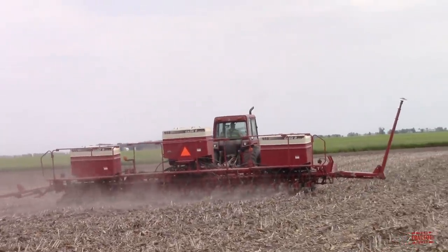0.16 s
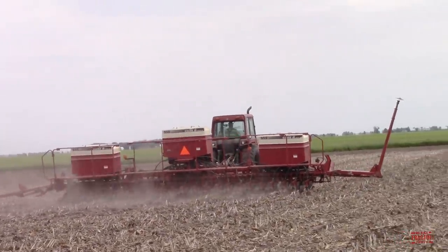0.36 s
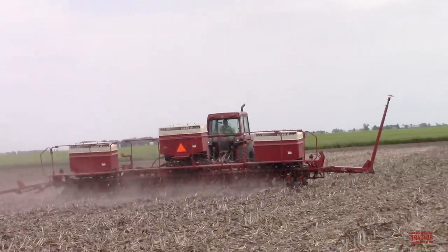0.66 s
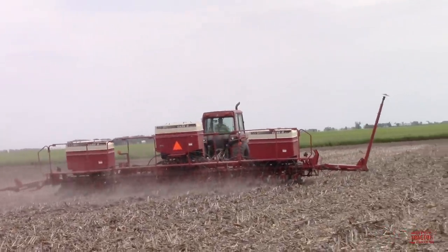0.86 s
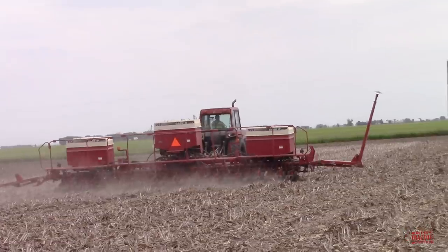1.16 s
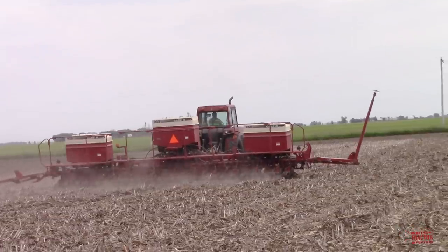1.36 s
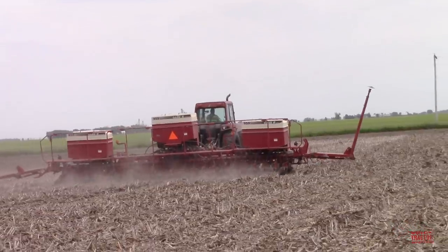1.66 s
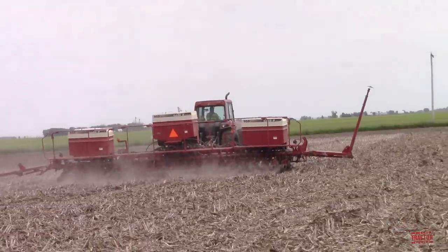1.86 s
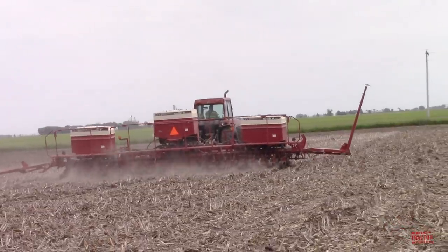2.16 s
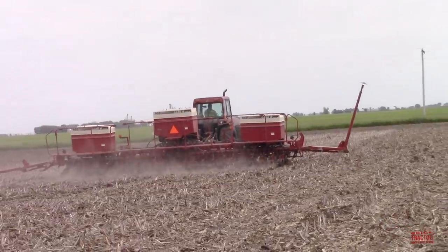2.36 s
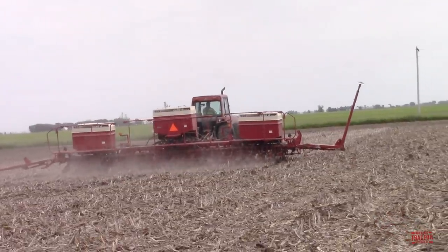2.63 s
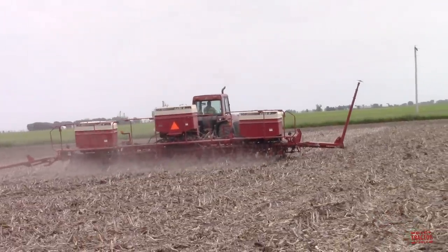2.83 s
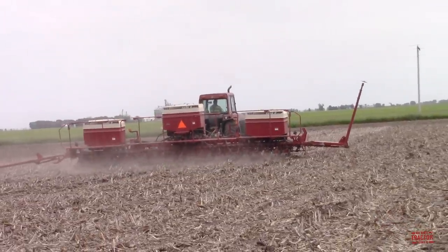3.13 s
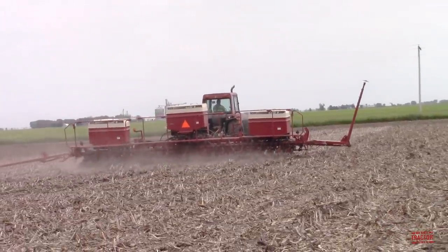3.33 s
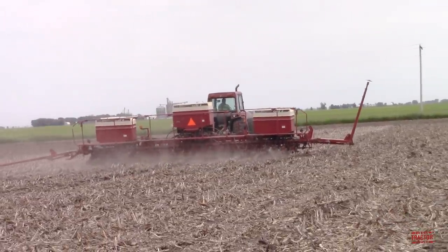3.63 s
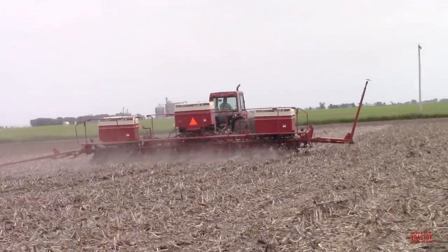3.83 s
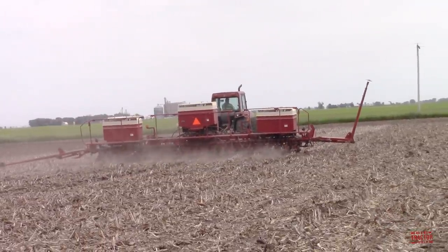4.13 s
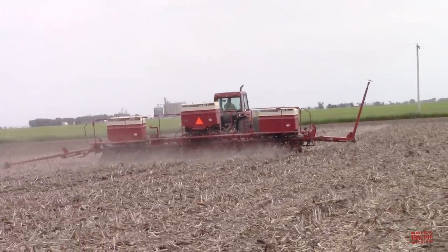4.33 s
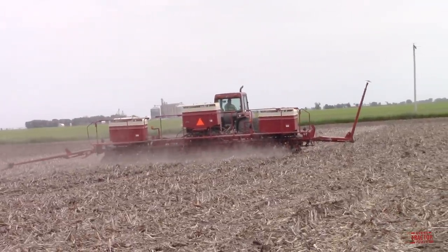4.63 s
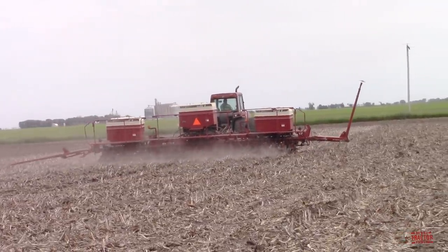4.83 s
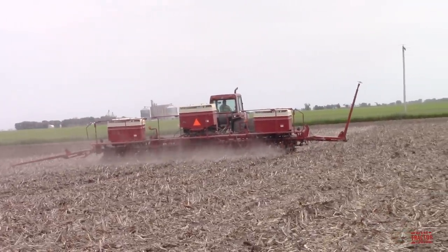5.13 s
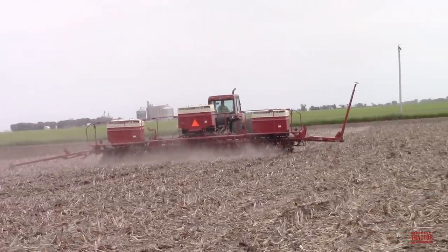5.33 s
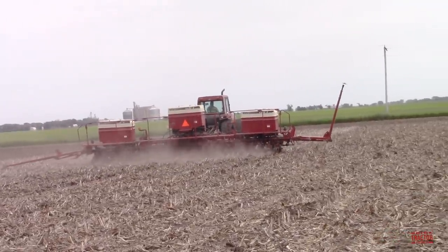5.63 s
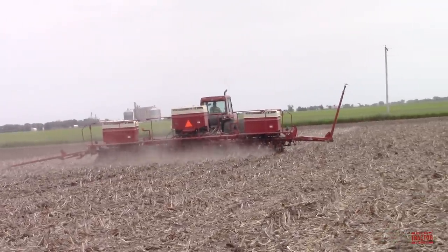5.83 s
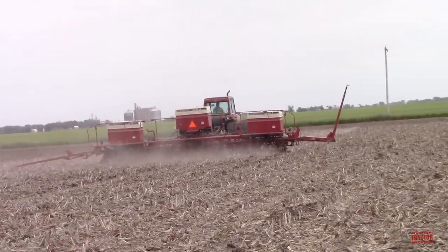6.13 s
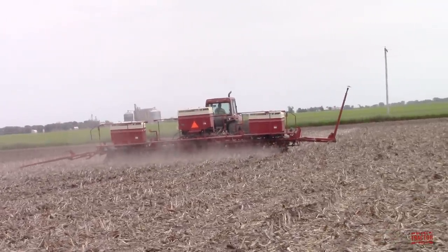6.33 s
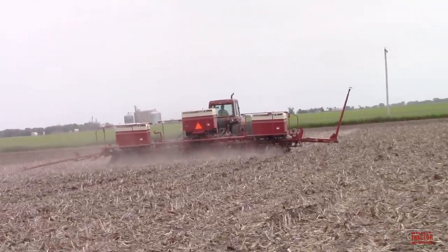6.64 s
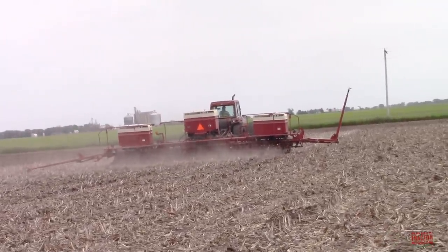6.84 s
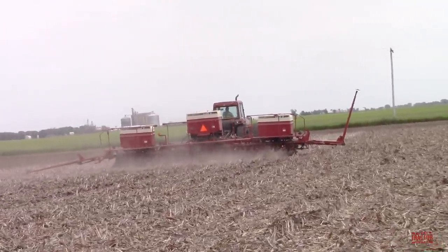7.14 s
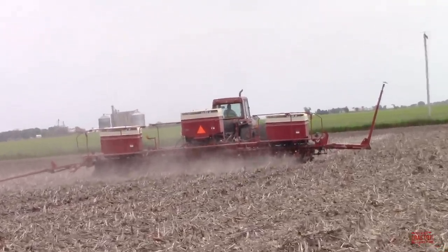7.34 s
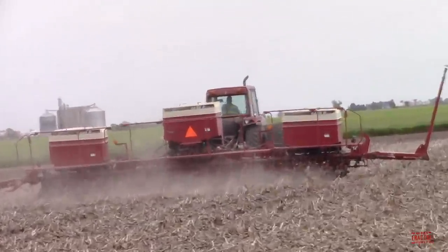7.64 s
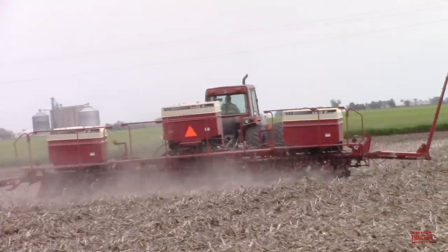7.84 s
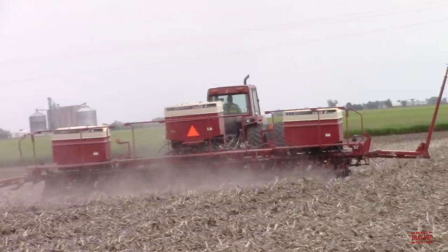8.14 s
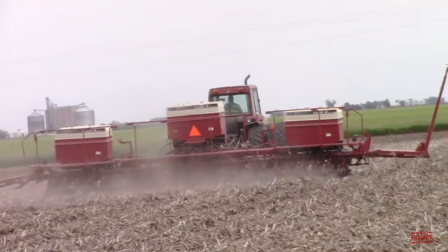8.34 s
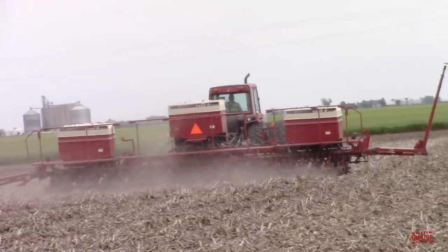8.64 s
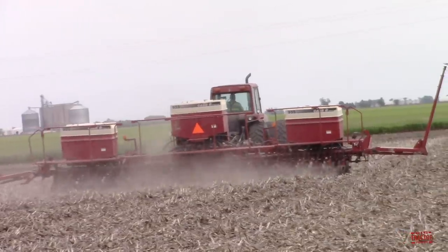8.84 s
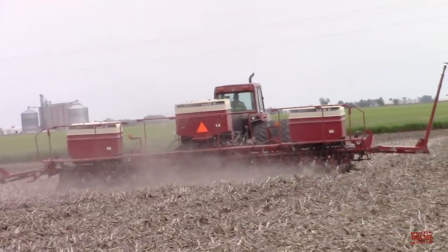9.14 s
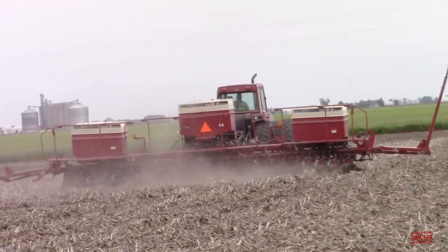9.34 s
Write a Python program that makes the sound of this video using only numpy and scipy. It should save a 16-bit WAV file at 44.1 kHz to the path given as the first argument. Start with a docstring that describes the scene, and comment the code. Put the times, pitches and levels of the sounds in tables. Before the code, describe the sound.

Steady throbbing diesel roar with rustling stalks, whining machinery and wind buffeting, losing level and bass past the middle while continuing to the end.

```python
"""Dry stubble in gusty air: a six-cylinder diesel tractor drags a seed planter, heard from behind.
Exhaust is cycle harmonics over pulsing roar; clatter, stalks and fan hiss are noise throbbing at the firings.
Pump and fan whine as sines, knocks are damped rings, ticks noise specks, and disc bearings squeak as rough tones.
Low noise gives the wind that buffets the microphone. Past the middle the level drops, the bass most;
the sound widens and its treble leans a little to the left."""
import sys
import numpy as np
from scipy import signal
from scipy.io import wavfile
from scipy.ndimage import uniform_filter1d, map_coordinates

SR = 44100
rng = np.random.default_rng(int(sys.argv[2]) if len(sys.argv) > 2 else 0)


def generate_wav(sig):
    """Save sig (samples, or channels by samples) to the path in sys.argv[1] as 16-bit PCM at SR."""
    pcm = np.round(np.clip(np.atleast_2d(sig).T, -1, 1) * 32767).astype(np.int16)
    wavfile.write(sys.argv[1], SR, pcm)


N = 418494

# Engine firing rate: start_s, rate_firings_per_s
FIRING_RATE = [(0.0, 123.25), (0.4, 123.1), (0.8, 123.55), (1.4, 123.5), (1.8, 123.1), (2.2, 123.45),
               (2.6, 123.3), (2.9, 123.7), (3.5, 123.9), (4.0, 123.6), (4.9, 123.78), (5.4, 123.4),
               (5.7, 123.68), (6.7, 123.5), (7.3, 123.87), (7.8, 123.52), (8.2, 123.66), (8.6, 124.3),
               (9.49, 123.9)]
# Relative strength of the successive firings in a cycle: level_db
CYLINDER_DB = [-10, -10, -18, -6.5, -11, -11]
# Harmonics of the six-firing cycle: multiple_of_cycle_rate, relative_level_db
EXHAUST_HARMONICS = [(6, -52), (12, -48.3), (14, -48.4), (15, -50.6), (17, -48.6), (18, -47.9), (21, -51.1),
                     (22, -47.6), (23, -48.2), (24, -44.4), (25, -42.4), (26, -41.9), (28, -35.4),
                     (29, -39.3), (30, -29.6), (31, -37.4), (34, -37.2), (35, -32.0), (36, -35.6),
                     (39, -42.2), (40, -44.9), (41, -42.0), (45, -49.1), (47, -49.2), (48, -47.3),
                     (49, -47.4), (56, -43.2), (57, -44.8), (62, -41.2), (79, -47.8)]
# Harmonics given their own slow drift: multiple_of_cycle_rate
LEADING_HARMONICS = (6, 30, 35)
# Their coming and going: time_s, then for each leading harmonic change_db
HARMONIC_DRIFT = [(0, -2, 0, 3), (.4, 1, 1.5, 0.5), (.85, -0.5, 1, -4), (1.25, -0.5, -1, -4),
                  (1.5, -2, -1, 0), (1.7, -2, 2, -10), (2.0, -1, -1, 4), (2.35, -9, -1.5, -1),
                  (2.6, -6, -1.5, -1.5), (3.0, -5, 2.5, 2), (3.25, -2, -3.5, -6), (3.5, -5, 0.5, 3),
                  (4.0, -11, -2, -2), (4.7, -4, 2.5, 0), (4.87, -4, -9.5, -3), (5.2, 2, 0.5, 3),
                  (5.7, 2, -1.5, -4), (6.6, 0, 3, 2), (8.4, 0, -5, -5), (8.9, 0, 1, -8), (9.49, 0, 1, -2)]
FIRST_BLOW, LOUDEST_PUFF = .2, 4.25  # places in the cycle (firings)

# Noise spectra, shape only: freq_hz, relative_density_db (per Hz)
EXHAUST_SPECTRUM = [(250, -38), (420, -8.5), (440, -18), (533, -9.5), (612, 0), (728, -2), (899, -4.5),
                    (960, -10.5), (1250, -16), (2110, -120)]
CLATTER_SPECTRUM = [(520, -51), (900, -10), (1000, -3.5), (1170, -0.5), (1310, -1), (1470, -6), (1630, -3),
                    (2000, -6.5), (2600, -21), (4400, -120)]
RUSTLE_SPECTRUM = [(1090, -55), (1850, -9.5), (2500, -2.5), (3450, -9.5), (4480, -17.5), (7590, -120)]
CRACKLE_SPECTRUM = [(1940, -24), (3300, -3), (4610, -0.5), (5250, -5), (5600, -15.5), (7280, -21),
                    (12300, -120)]
HISS_SPECTRUM = [(3240, -51), (5500, -39), (5650, -10.5), (6240, -2), (7050, -1), (9050, -5.5),
                 (10400, -11.5), (13100, -32), (14400, -32), (15600, -38)]
THUD_SPECTRUM = [(24, -72), (40, -63), (113, -6.5), (180, 0.5), (230, -6), (400, -120)]
WIND_SPECTRUM = [(97, -65), (165, -9.5), (237, 1.5), (470, 0.5), (610, -3), (1030, -120)]
RUMBLE_SPECTRUM = [(20, -4), (40, -3), (90, 2), (160, 0), (300, -20), (500, -80)]

# Crackle against the rustle: time_s, level_db
CRACKLE_LEVEL = [(0, 3), (.4, -9), (1.2, -8.5), (2.0, -5.5), (2.9, -5.5), (3.5, -7), (3.85, -10.5),
                 (4.2, -0.5), (5.0, -3.5), (5.5, -7), (6.2, -5), (6.7, -3), (7.3, -6), (8.0, -3.5),
                 (8.9, -5), (9.49, -3)]
# Slow level as the air carries the sound: time_s, exhaust_db, clatter_db, planter_db, fan_db
CARRYING = [(0.0, -24.5, -23.5, -33, -30.5), (0.4, -22, -24, -26.5, -29.5), (0.85, -24, -23, -26, -32),
            (1.25, -26, -26, -29, -33.5), (1.5, -20.5, -23.5, -29, -34), (1.85, -22.5, -28.5, -29, -35),
            (2.15, -22, -22.5, -30.5, -35.5), (2.6, -24, -27.5, -28.5, -35.5), (3.0, -22, -26, -29, -33),
            (3.65, -20, -21.5, -23.5, -36), (4.0, -22, -22, -31.5, -36), (4.75, -23, -24, -31.5, -33),
            (5.05, -22.5, -24.5, -30.5, -33), (5.33, -28, -23, -26.5, -33), (5.6, -24, -25, -31.5, -36),
            (5.8, -25.5, -30, -33.5, -39.5), (6.1, -33.5, -32.5, -34.5, -41), (6.6, -30.5, -34.5, -37, -40),
            (7.2, -32.5, -34.5, -35.5, -43), (7.6, -30.5, -33, -35.5, -43.5), (8.0, -33, -35, -35.5, -39),
            (8.2, -32.5, -31.5, -36.5, -42), (8.55, -27.5, -36, -37.5, -40),
            (8.85, -34.5, -33.5, -38, -44.5), (9.2, -32.5, -34.5, -36.5, -42.5),
            (9.49, -31, -35.5, -40, -43)]
# Brief swells (or lulls) of the din: centre_s, height_db, length_s (at the centre pitch),
# centre_octaves (above 1 kHz)
DIN_SWELLS = [(0.084, 0, .12, 3), (0.293, 6, 0.12, 1.4), (0.52, 3, 0.15, 0.5), (0.665, 6, 0.07, 1.9),
              (0.794, -2, 0.16, 3), (1.183, 4.5, 0.14, 0.2), (1.187, 3, 0.086, 3.5),
              (1.32, -2.5, 0.082, 3.5), (1.545, 3.5, 0.067, 1), (1.55, 1.5, .06, 1.9),
              (1.614, 7, 0.12, 2.1), (1.75, -6.5, 0.13, 2.5), (1.8, -2, 0.18, 0), (1.93, 5.5, 0.24, 1.2),
              (2.076, -0.5, 0.14, 2), (2.244, 6.5, 0.12, 2.1), (2.584, 3.5, 0.24, 0.8),
              (2.804, -3.5, 0.11, 1), (2.974, 4.5, 0.29, 1.1), (3.19, 5, 0.21, 1.5), (3.2, 2, 0.066, 2.5),
              (3.36, -2.5, 0.081, 1.5), (3.454, -2.5, 0.081, 3.5), (3.493, -2, .05, 2),
              (3.535, 1.5, .04, 3), (3.59, 7, 0.12, 2.5), (3.717, 1, .08, 2), (3.797, 1, 0.11, 1.3),
              (3.83, 1.5, .2, 3), (4.065, 4, 0.1, 3), (4.35, 2, 0.2, 3), (4.62, 4, 0.078, 2.5),
              (4.763, 9, 0.047, -1.6), (4.896, 2.5, .08, 3.5), (5.323, 1.5, 0.077, 2.2),
              (5.782, 0.5, 0.17, 2), (6.24, 4, 0.083, 2), (6.54, -7, .08, 0), (6.404, -5, 0.1, 2.5),
              (6.52, 3, 0.078, 1.3), (6.68, -3.5, 0.22, 0.2), (6.9, 7, 0.089, 2), (6.915, 3.5, 0.057, 2.8),
              (7.032, -2.5, .1, 3), (7.07, 1.5, 0.073, 1.5), (7.2, 1.5, 0.085, 2), (7.436, 5.5, 0.18, 2.5),
              (7.632, 4.5, 0.081, 2.6), (7.768, -4, 0.18, 1.8), (7.95, -0.5, .14, 3), (8.13, 4, .15, -0.5),
              (8.15, 1, 0.053, 2.2), (8.32, 2, 0.11, 1), (8.695, -4.5, 0.26, 1), (8.55, 2, .06, -0.5),
              (8.81, 1.5, .06, 0.5), (8.932, 4, 0.12, 1.7), (9.19, 5, 0.16, 2)]
SWELL_OCTAVES = 0.71  # standard deviation in pitch, to either side
SWELL_SHORTENING = 0.12  # octaves of length that a swell loses per octave of pitch

# Pump tones, geared to the crank: multiple_of_firing_rate, relative_level_db
PUMP_TONES = [(32.62, 0), (38.04, -2)]
# Fan blade tones: mean_pitch_hz, relative_level_db
FAN_TONES = [(3811, 1), (4445, -1.5), (5078, -5)]
# Whine levels: time_s, pump_db, fan_db
WHINE_LEVELS = [(0.0, -45, -46), (0.5, -45, -41), (1.05, -43, -43), (1.5, -46, -45), (2.1, -45, -53),
                (3.4, -48, -49), (4.3, -40, -49), (5.3, -45, -48), (6.1, -53, -58), (7.4, -56, -64),
                (7.95, -52, -62), (8.1, -55, -62), (8.3, -50, -61), (8.55, -51, -60), (8.8, -56, -59),
                (9.13, -48, -59), (9.3, -54, -60), (9.49, -54, -60)]

# Depth of the dip where the ground echo cancels one band: time_s, depth_db (values above 0 give no dip)
HOLLOW_DEPTH = [(0, -2), (1.1, -7), (1.7, -1), (2.6, -2.5), (3.0, -5), (4.0, -1), (9.49, 1)]
HOLLOW_HZ, HOLLOW_WIDTH_HZ = 900, 54  # centre and standard deviation

# Gusts (and lulls) on the microphone: centre_s, length_s, thud_change_db, roar_change_db
WIND_GUSTS = [(.4, 0.1, 6, 2), (0.198, 0.082, 5, 2.5), (1, 0.11, 8, -2), (1.657, 0.25, 10, 3.5),
              (1.942, 0.22, 10, 7), (2.602, 0.11, 5, 1), (2.17, 0.096, -1, -6), (2.847, 0.05, 6, 6),
              (2.977, 0.076, -5, -4), (3.623, 0.05, -2, 5.5), (3.9, 0.43, 3, 3), (4.15, 0.1, -6, 0.5),
              (4.755, 0.21, -2, 3), (5.093, 0.12, -3, 6.5), (5.203, 0.11, 15, 3), (5.293, 0.076, 9.5, 2),
              (5.38, 0.091, 3, -2), (5.47, .1, 6, 2), (5.552, 0.047, 5, 1), (5.602, 0.082, 12, 13),
              (5.702, 0.077, 6, 10), (5.96, .08, 0, -3), (6.02, 0.037, 2, 6), (7.11, .1, 0, 4),
              (7.72, 0.32, 11, 5.5), (7.97, 0.09, -4, -4), (8.332, 0.43, 15, 7.5), (8.5, 0.074, 4, 0),
              (9.122, 0.069, 5, 7), (9.257, 0.076, 5, 5.5)]
THUD_DB, ROAR_DB = -51, -33.5  # steady wind before the slow changes and gusts
# Slow changes of the wind: time_s, thud_change_db, roar_change_db
WIND_EASING = [(0, 1, -1), (5.72, 6, 0.5), (5.86, -5, 3.5), (6.2, -4, -3), (9.49, 2.5, 1)]

# Disc-bearing squeaks: start_s, length_s, peak_level_db, mean_pitch_hz
BEARING_SQUEAKS = [(0.42, .07, -30, 7310), (0.51, .03, -32, 7550), (0.545, .035, -31, 7100),
                   (0.95, .06, -33, 7430), (1.04, .06, -30.5, 7290), (1.1, .09, -32.5, 7230),
                   (1.32, .1, -37, 7360), (2.098, .035, -31, 7430), (2.26, .05, -35, 7430),
                   (3.99, .08, -34, 7280), (4.08, .04, -36, 7330), (4.815, .05, -33, 7370),
                   (4.88, .03, -32, 7150), (5.05, .06, -30.5, 7190), (5.14, .04, -36, 6800),
                   (7.195, .04, -39, 7180), (8.033, .03, -39, 7310), (8.134, .035, -39, 7300)]
# Loose metal knocks on the planter: start_s, strength_db (relative), pitch_hz
METAL_KNOCKS = [(1.0989, -8, 1600), (1.5339, 2, 1300), (2.5087, -2, 1580), (2.9642, 1, 1206),
                (2.9938, -1.5, 1290), (3.5264, -12, 1150), (3.63, -1, 1105), (3.68, -8, 1210),
                (6.764, -15, 3220), (7.5794, -27, 2470), (7.5984, -17, 2310), (7.605, -10, 1670),
                (7.6193, -15, 1970), (8.0396, -15, 1310), (8.044, -15, 3620), (8.1454, -18, 1490),
                (8.16, -18, 2950), (8.331, -19, 2370)]
# Bright ticks: start_s, strength_db (before filtering and decay), lowest_hz, highest_hz
BRIGHT_TICKS = [(3.9144, -33, 11000, 15500), (3.9274, -33, 11000, 15500), (4.0682, -30, 12000, 15500),
                (4.0685, -8, 5000, 7000), (4.1909, -36, 11000, 15500), (4.8853, -13, 6500, 8500),
                (5.3794, -36, 9000, 15500), (5.657, -39, 10000, 15500), (8.0401, -22, 6500, 9000),
                (8.1504, -21, 6500, 9000), (8.295, -38, 8500, 14000)]

# Share of the thinner spectrum: time_s, share (0-1)
THIN_SHARE = [(0, 0), (5.7, 0), (6.15, 1), (9.49, 1)]
# Full thinning: freq_hz, change_db
THIN_SPECTRUM = [(60, -26), (125, -31), (250, -22.5), (600, -16), (1000, -9.5), (1600, -1.5), (2500, 0.5),
                 (9000, -2), (14000, -9.5)]
# The lows thin out first: freq_hz, power (on the share)
THIN_POWER = [(100, .35), (300, 0.86), (800, 1.2), (3000, 1.9)]
# Bass jumps to a new offset: start_s, offset_db
BASS_OFFSETS = [(6.085, -12.5), (6.578, -5.5), (7.08, -0.5), (7.6, 1.5), (8.07, 2.5), (8.63, -4.5),
                (9.09, -2)]
# How much of each offset a pitch takes: freq_hz, share
BASS_OFFSET_SHARE = [(100, 0.64), (300, 0.62), (440, 0.75), (480, 1.2), (530, 1.1), (580, 1.4), (620, 1),
                     (680, 0.86), (800, 0.32), (1000, 0.24), (1400, .01)]
# Share of the sideways sound: time_s, share (0-1)
SIDE_SHARE = [(0, 0), (5.77, 0), (5.8, .5), (6.05, 1), (9.49, 1)]
# Level tilt at full share, before the unrelated side: freq_hz, left_minus_right_db
LEFT_TILT = [(300, 0), (800, 1), (1050, 0), (2600, 0), (3500, 2.5), (4500, 3.7), (5400, 3), (8000, 2),
             (10000, 2), (12000, 0)]
# Lag of the left behind the right at full share: freq_hz, phase_rad
LEFT_PHASE_LAG = [(5000, 0), (6800, .1), (9500, .5), (15000, .5)]
# Unrelated side sound against the middle, at full share: freq_hz, level_db
UNRELATED_SIDE = [(60, -2.), (110, -7.), (200, -29), (400, -36), (750, -14.5), (1050, -19), (1300, -38),
                  (1900, -47), (2600, -25), (4000, -16), (8000, -7.5), (15000, 11)]
RUMBLE_DB, EDGE_HZ = -81.5, 15720  # faint late floor; upper band limit


def gain_of(db):
    """Logarithmic level: decibels become an amplitude factor."""
    return 10 ** (np.asarray(db) / 20)


def evened(x):
    """Power normalisation: the root mean square becomes one."""
    return x / np.sqrt(np.mean(x ** 2) + 1e-20)


def read(points, hz):
    """Spectral interpolation along a logarithmic frequency axis."""
    f, value = np.transpose(points)
    return np.interp(np.log(hz + 1), np.log(f + 1), value)


def curve(table, axis=1):
    """Linear interpolation in time: one column of a table at every sample."""
    rows = np.asarray(table)
    return np.interp(np.arange(N) / SR, rows[:, 0], rows[:, axis])


def wander(top_hz):
    """Slow fluctuation: superposed sines of random phase, up to top_hz, of rms one."""
    t = np.arange(0, N + 256, 256) / SR
    slow = 0
    for f in np.geomspace(top_hz / 8, top_hz, 16):
        slow = slow + np.sin(2 * np.pi * (f * t + rng.random())) / np.sqrt(f)
    return np.interp(np.arange(N) / SR, t, evened(slow))


def noise(spectrum, patchy_db, drive=1):
    """Modulated, filtered noise: drifting spectral patches arise as moving air bends the path."""
    hz, _, z = signal.stft(drive * rng.standard_normal(N), SR, nperseg=1024, noverlap=768)
    patches = rng.standard_normal(z.shape[::-1]).T
    patches = uniform_filter1d(patches, size=10, axis=0)
    patches = evened(uniform_filter1d(patches, size=10, axis=1))
    z = z * gain_of(read(spectrum, hz)[:, None] + patchy_db * patches)
    return evened(signal.istft(z, nperseg=1024, noverlap=768)[1][:N])


def throb(firings, depth, decay, uneven_db):
    """Amplitude modulation: loudness jumps at each firing and decays (time constant in firings)."""
    which = firings.astype(int)
    size_db = np.asarray(CYLINDER_DB)[which % len(CYLINDER_DB)]
    size_db = size_db + uneven_db * rng.standard_normal(2000)[which]
    puff = gain_of(size_db) * np.exp(-(firings % 1) / decay)
    return evened(1 + depth * uniform_filter1d(puff, size=50))


def snaps(per_s, spread_db, decay_s):
    """Random impulse process: stalks break at chance moments and each burst decays exponentially."""
    struck = rng.random(N) < per_s / SR
    size = gain_of(spread_db * np.minimum(rng.exponential(1, N), 4)) * struck
    return evened(1 + signal.lfilter([1], [1, -np.exp(-1 / (decay_s * SR))], size))


def bump(s, length, square=2):
    """Bell envelope about s, length wide at half height; a higher square flattens the top."""
    t = np.arange(0, N + 64, 64) / SR
    return np.exp(-np.log(2) * abs(2 * (t - s) / max(length, .03)) ** square)


def stretch(coarse):
    """Upsampling by interpolation: values at every 64th sample reach all samples."""
    return np.interp(np.arange(N), np.arange(len(coarse)) * 64, coarse)


def exhaust(firings):
    """Periodic pulsation: cycle harmonics, loosely in phase at the loudest puff, join throbbing roar."""
    cycle = 2 * np.pi * (firings - LOUDEST_PUFF) / len(CYLINDER_DB)
    drift_db = {k: curve(HARMONIC_DRIFT, axis=column)
                for column, k in enumerate(LEADING_HARMONICS, start=1)}
    tones = 0
    for k, db in EXHAUST_HARMONICS:
        level_db = db + drift_db.get(k, 0) + 0.8 * wander(3.5)
        phase = k * cycle + .8 * wander(1.2) + .2 * wander(9.)
        tones = tones + gain_of(level_db) * np.cos(phase)
    # The strongest firing falls just before the loudest puff
    puffs = firings + len(CYLINDER_DB) + np.argmax(CYLINDER_DB) - LOUDEST_PUFF + .15
    roar = noise(EXHAUST_SPECTRUM, 0.79, throb(puffs, depth=0.9, decay=0.58, uneven_db=5.5))
    tone_share = gain_of(-1.9)
    roar_share = np.sqrt(np.maximum(1 - tone_share ** 2, .05))  # keeps the total power
    return tone_share * evened(tones) + roar_share * roar


def clatter(blows):
    """Impact noise: band-limited noise is strongly modulated by the firings."""
    return noise(CLATTER_SPECTRUM, 1.0, throb(blows, depth=3.4, decay=.5, uneven_db=1.8))


def planter(blows):
    """Fracture noise: dense rustle and sparser crackle of stalks share the engine's modulation."""
    rustle_drive = throb(blows, depth=2., decay=.45, uneven_db=1.5) * snaps(120., .5, .001)
    crackle_drive = throb(blows, depth=1.8, decay=0.4, uneven_db=3.0) * snaps(32.0, 0.7, 0.001)
    rustle = noise(RUSTLE_SPECTRUM, .9, rustle_drive)
    crackle = noise(CRACKLE_SPECTRUM, 2.2, crackle_drive)
    return rustle + gain_of(curve(CRACKLE_LEVEL)) * crackle


def fan_hiss(blows):
    """Broadband flow noise: high hiss is lightly modulated, its firing pattern two firings late."""
    return noise(HISS_SPECTRUM, 1.8, throb(blows - 2, depth=.6, decay=0.4, uneven_db=3.5))


def swollen(x):
    """Time-varying filtering: each swell lifts the pitches around its centre, higher ones more briefly."""
    hz, t, z = signal.stft(x, SR, nperseg=512)
    octaves = np.linspace(-2, 4, 19)  # above 1 kHz
    rows = []
    for octave in octaves:
        row = 0
        for s, db, length, centre in DIN_SWELLS:
            reach = np.exp(-.5 * ((octave - centre) / SWELL_OCTAVES) ** 2)
            length_here = length * 2 ** (SWELL_SHORTENING * (centre - octave))
            row = row + db * reach * bump(s, length_here)[::4]  # one value per spectral frame
        rows.append(row)
    place = np.interp(np.log2((hz + 1) / 1000), octaves, np.arange(len(octaves)))
    grid = np.meshgrid(place, np.arange(len(t)), indexing="ij")
    lift_db = map_coordinates(np.array(rows), grid, order=1, mode="nearest")
    return signal.istft(z * gain_of(lift_db), nperseg=512)[1][:N]


def whines(firings):
    """Rotational tones: hydraulic pump and seed fan sound as sines, flickering and slightly unsteady."""
    drift_s = np.cumsum(.0012 * wander(14.)) / SR  # shared slip of phase, as time
    pump_phase = 2 * np.pi * (firings + FIRING_RATE[0][1] * drift_s)
    fan_phase = 2 * np.pi * (np.arange(N) / SR + drift_s)
    pump = sum(gain_of(db + 2 * wander(6.)) * np.sin(k * pump_phase) for k, db in PUMP_TONES)
    fan = sum(gain_of(db + 2 * wander(6.)) * np.sin(hz * fan_phase) for hz, db in FAN_TONES)
    return gain_of(curve(WHINE_LEVELS, axis=1)) * pump + gain_of(curve(WHINE_LEVELS, axis=2)) * fan


def machine():
    """Superposition: engine and planter, locked to one firing count, add with the whines."""
    firings = np.cumsum(curve(FIRING_RATE)) / SR
    blows = firings + len(CYLINDER_DB) - FIRST_BLOW
    parts = exhaust(firings), clatter(blows), planter(blows), fan_hiss(blows)
    din = sum(gain_of(curve(CARRYING, axis=k)) * part for k, part in enumerate(parts, start=1))
    return swollen(din) + whines(firings)


def hollowed(x):
    """Destructive interference: a narrow band dips by a depth that varies in time."""
    hz, t, z = signal.stft(x, SR, nperseg=2048)
    dip = np.exp(-.5 * ((hz - HOLLOW_HZ) / HOLLOW_WIDTH_HZ) ** 2)
    depth_db = np.minimum(np.interp(t, *np.transpose(HOLLOW_DEPTH)), 0)
    return signal.istft(z * gain_of(np.outer(dip, depth_db)), nperseg=2048)[1][:N]


def wind():
    """Turbulent pressure: lumpy low noise buffets the microphone and rises in gusts."""
    lumps_db = 1.0 * wander(24.)
    thud_gusts = sum(db * bump(s, length, square=1.8) for s, length, db, _ in WIND_GUSTS)
    roar_gusts = sum(db * bump(s, length, square=2.2) for s, length, _, db in WIND_GUSTS)
    thud_db = THUD_DB + curve(WIND_EASING, axis=1) + stretch(thud_gusts) + lumps_db
    roar_db = ROAR_DB + curve(WIND_EASING, axis=2) + stretch(roar_gusts) + lumps_db
    return gain_of(thud_db) * noise(THUD_SPECTRUM, 1.) + gain_of(roar_db) * noise(WIND_SPECTRUM, 1.1)


def squeaks():
    """Frequency modulation: brief whistles, roughened by random pitch, swell and fade."""
    out = np.zeros(N + SR)
    shake = rng.standard_normal((len(BEARING_SQUEAKS), 5000))
    for (s, length, db, hz), chance in zip(BEARING_SQUEAKS, shake):
        count = int(length * SR)
        shaky_hz = hz * (1 + 0.09 * uniform_filter1d(chance, size=80)[:count])
        whistle = np.sin(2 * np.pi * np.cumsum(shaky_hz) / SR)
        out[round(s * SR):][:count] += gain_of(db) * np.hanning(count) ** .5 * whistle
    return out[:N]


def knocks():
    """Damped free vibration: each blow on loose metal rings in two modes and loses 60 dB in 24 ms."""
    out, t = np.zeros(N + 1000), np.arange(600) / SR
    rise = 1 - np.exp(-t / 0.0016)
    for s, db, hz in METAL_KNOCKS:
        ring = np.sin(2 * np.pi * hz * t) + .4 * np.sin(2 * np.pi * 1.9 * hz * t)
        out[round(s * SR):][:600] += gain_of(db - 5.0 - 60 * t / 0.024) * rise * ring
    return out[:N]


def ticks():
    """Transient noise: each bright speck is band-passed noise whose gain falls 60 dB in 17 ms."""
    out, t = np.zeros(N + 1000), np.arange(600) / SR
    for s, db, low_hz, high_hz in BRIGHT_TICKS:
        band = signal.butter(2, [low_hz, high_hz], "band", fs=SR)
        speck = signal.lfilter(*band, rng.standard_normal(600))
        out[round(s * SR):][:600] += gain_of(db - 60 * t / 0.017) * speck
    return out[:N]


def scene():
    """Superposition without direction: both channels receive the same sum, from straight ahead."""
    mono = hollowed(machine()) + wind() + squeaks() + knocks() + ticks()
    return np.array([mono, mono])


def thinned(z, hz, t):
    """Spectral attenuation: the later sound loses level, lows first, and its bass jumps in steps."""
    late = np.interp(t, *np.transpose(THIN_SHARE))
    power = np.clip(read(THIN_POWER, hz), .1, 3)[:, None]
    step_db, before_db = 0, 0
    for s, db in BASS_OFFSETS:
        step_db = step_db + (db - before_db) * np.clip((t - s) / 0.015 + .5, 0, 1)  # 15 ms ramp
        before_db = db
    thin_db = read(THIN_SPECTRUM, hz)[:, None] * late ** power
    return z * gain_of(thin_db + np.outer(read(BASS_OFFSET_SHARE, hz), step_db))


def sideways(z, hz, t):
    """Interaural difference and decorrelation: level tilt, phase lag and random phases widen the sound."""
    level_tilt = np.tanh(read(LEFT_TILT, hz) * np.log(10) / 40)
    tilt = (level_tilt - 1j * np.tan(read(LEFT_PHASE_LAG, hz) / 2))[:, None]
    loose = gain_of(read(UNRELATED_SIDE, hz))[:, None] * np.exp(2j * np.pi * rng.random(z.shape))
    power = np.where(hz < 2800, 6, 1)[:, None]  # the lows widen last
    return np.interp(t, *np.transpose(SIDE_SHARE)) ** power * z * (tilt + loose)


def record(dry):
    """Linear filtering: a bass cut, late thinning and widening over faint rumble, then the band limit."""
    bass_cut = signal.butter(2, 70, "high", fs=SR, output="sos")
    mid = signal.sosfilt(bass_cut, dry.mean(0))
    hz, t, z = signal.stft(mid, SR, nperseg=1024, noverlap=768)
    z = thinned(z, hz, t)
    side = sideways(z, hz, t)
    pair = signal.istft(np.array([z + side, z - side]), SR, nperseg=1024, noverlap=768)[1][:, :N]
    rumble = np.array([noise(RUMBLE_SPECTRUM, 1.5), noise(RUMBLE_SPECTRUM, 1.5)])
    pair = pair + gain_of(RUMBLE_DB) * curve(SIDE_SHARE) * rumble
    band_limit = signal.firwin(1023, EDGE_HZ, window=("kaiser", 9), fs=SR)
    return signal.oaconvolve(pair, band_limit[None], "same")


dry = scene()
out = record(dry)
generate_wav(out)
```